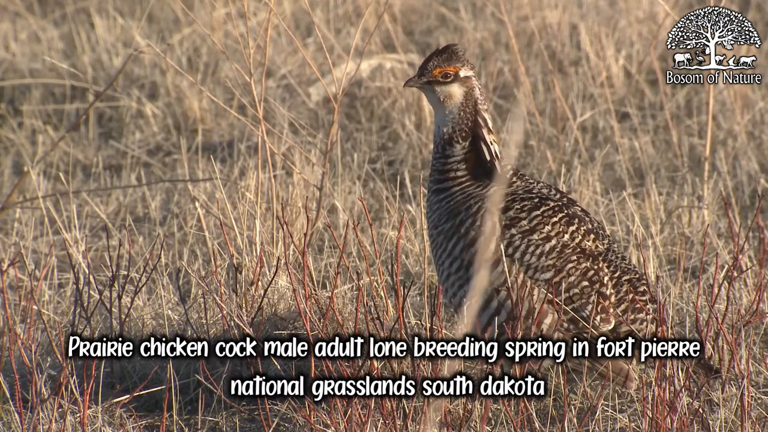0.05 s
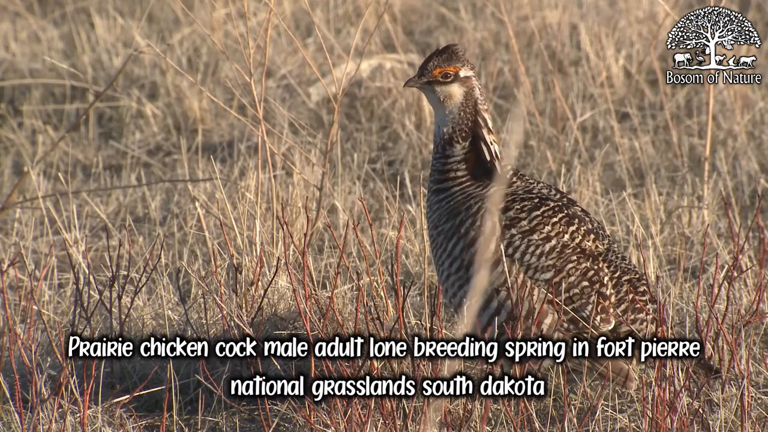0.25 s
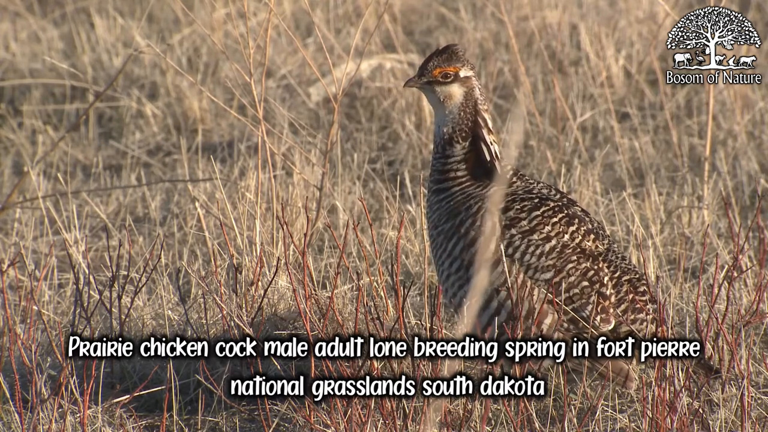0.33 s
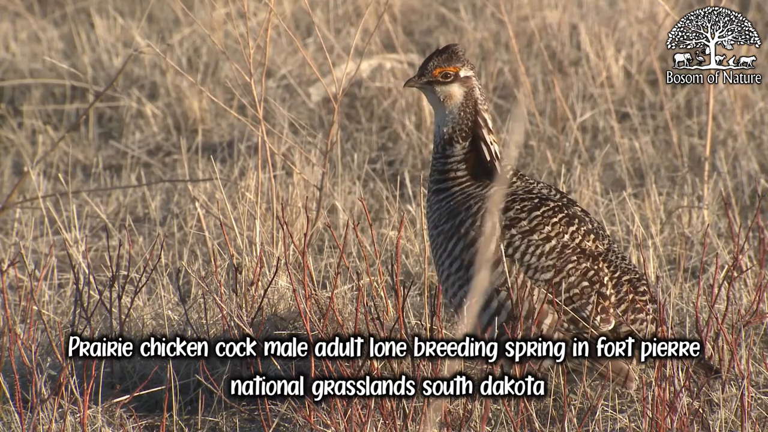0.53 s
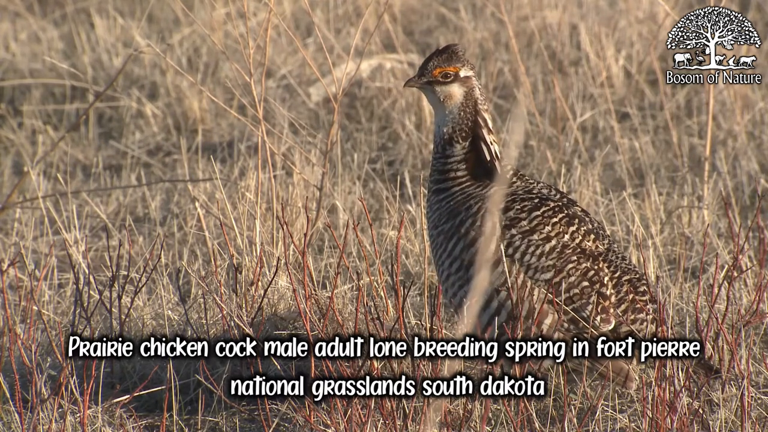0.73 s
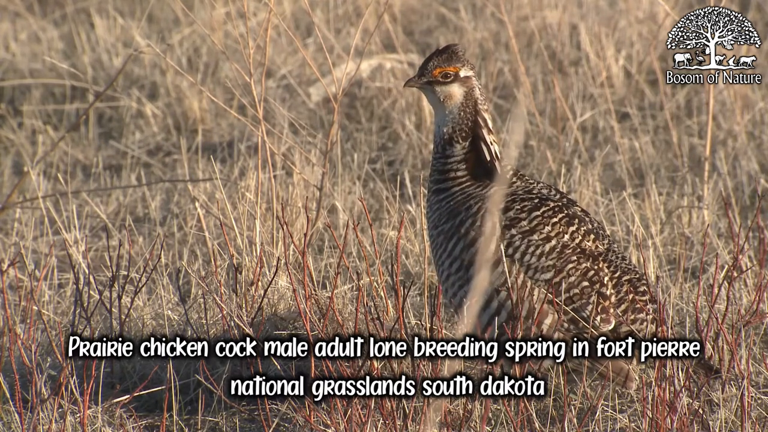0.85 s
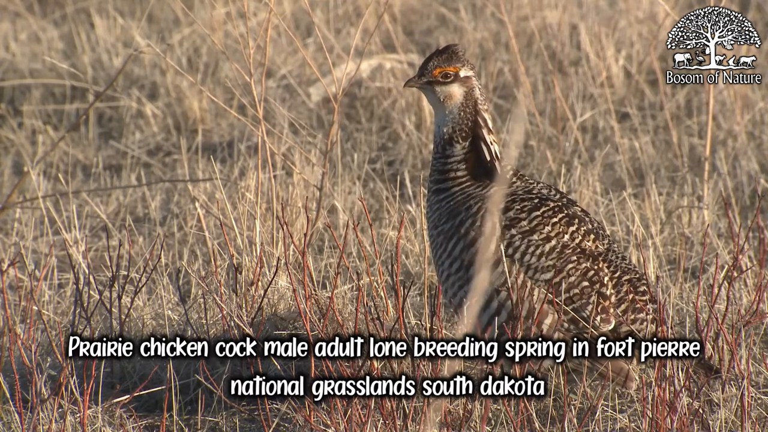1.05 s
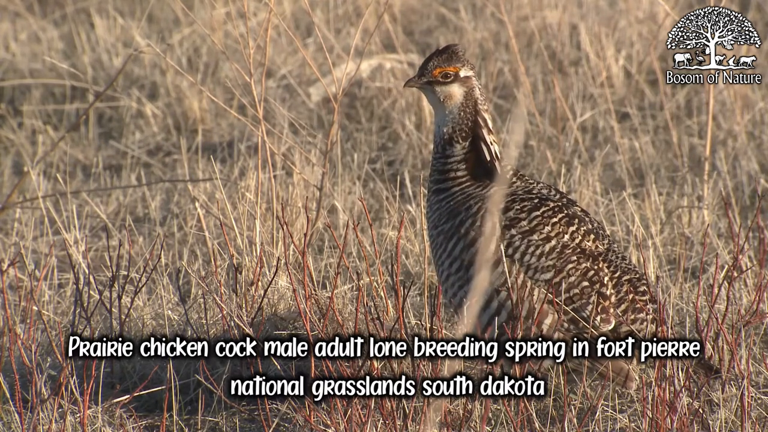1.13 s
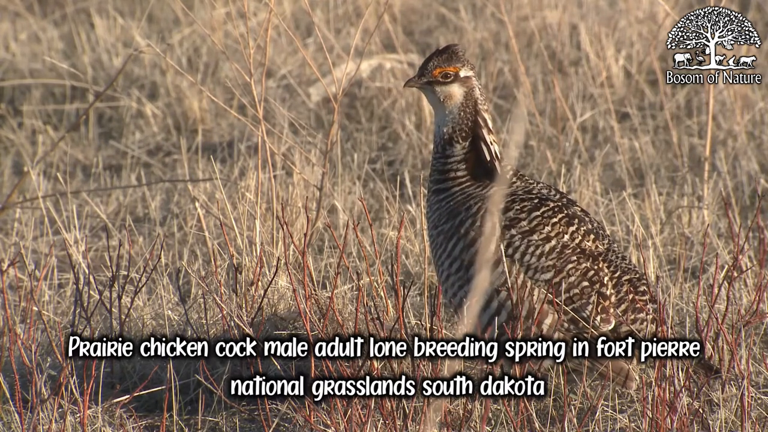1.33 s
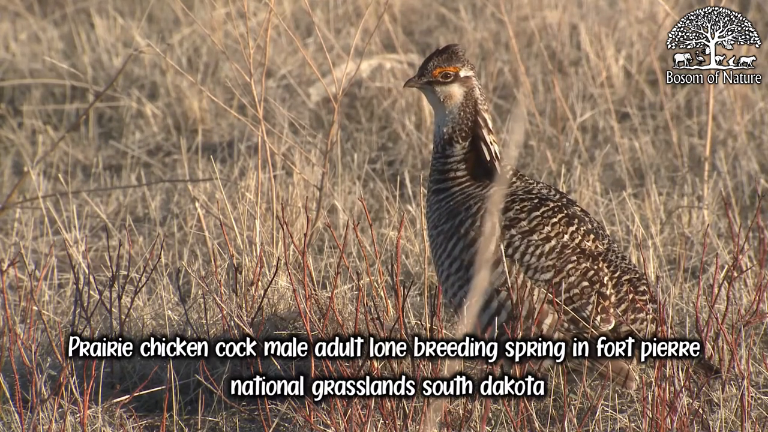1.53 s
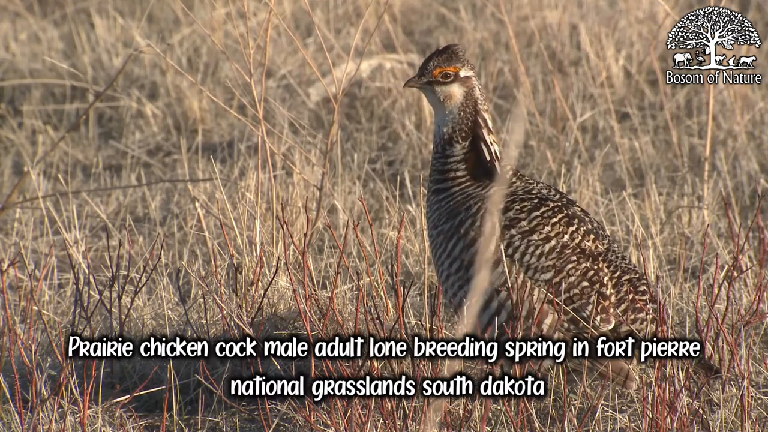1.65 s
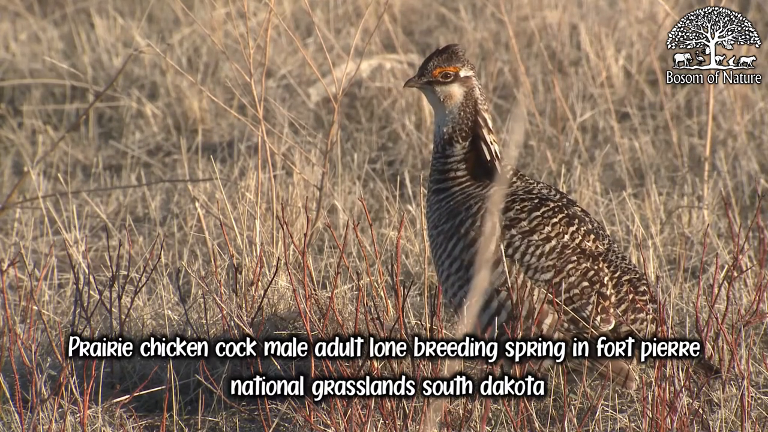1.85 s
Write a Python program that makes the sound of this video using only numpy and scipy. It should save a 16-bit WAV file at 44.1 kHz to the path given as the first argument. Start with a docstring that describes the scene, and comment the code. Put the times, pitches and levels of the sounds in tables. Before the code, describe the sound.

Wind rumbles unevenly on the microphone and hisses through dry grass in open country. A songbird whistles faintly far off, then a small bird chips twice and a distant grouse gives one low hoot.

```python
"""Gust over dry grassland

Out in the open, wind buffets a single microphone and rushes, hisses and ticks through the stems.
A songbird whistles very far off, a small bird gives two short raspy chips, and a distant grouse
hoots one low, sinking note. The microphone feeds the right channel; the left holds only the
faint preamplifier hiss that lies under both."""
import sys
import numpy as np
from scipy import signal
from scipy.io import wavfile
from scipy.ndimage import uniform_filter1d

SR = 44100
rng = np.random.default_rng(int(sys.argv[2]) if len(sys.argv) > 2 else 0)


def transcribe(signal):
    """Save signal, clipped to [-1, 1], as a 16-bit WAV file at the path in sys.argv[1]."""
    frames = np.atleast_2d(signal).T
    limited = np.clip(frames, -1, 1)
    pcm = np.round(limited * 32767).astype(np.int16)
    wavfile.write(sys.argv[1], SR, pcm)


N = 83790

# wind pressure on the microphone: time_s, relative_level_db
WIND_PRESSURE = [(0.0, -48.5), (0.178, -45), (0.232, -34), (0.29, -47.5), (0.386, -39), (0.422, -40.5),
                 (0.486, -35.5), (0.598, -35.5), (0.612, -43), (0.656, -26), (0.698, -39.5), (0.718, -32.5),
                 (0.75, -39), (0.782, -25), (0.82, -41), (0.84, -28.5), (0.942, -38), (0.994, -25.5),
                 (1.042, -28), (1.062, -39), (1.122, -29), (1.158, -39.5), (1.29, -40.5), (1.316, -55.5),
                 (1.47, -37), (1.496, -43), (1.528, -34), (1.676, -47.5), (1.73, -45), (1.782, -60),
                 (1.878, -55.5), (1.9, -45)]
# rumble of the large eddies: frequency_hz, relative_density_db
RUMBLE_SPECTRUM = [(15, -7.5), (28, -0.5), (45, 3), (65, -6), (100, -12), (140, -21.5), (220, -45)]
# smaller eddies around the windshield: time_s, relative_level_db
FLUTTER_LEVELS = [(0.0, -65), (0.158, -67), (0.226, -56.5), (0.258, -58.5), (0.464, -50), (0.554, -52.5),
                  (0.634, -44), (0.814, -42.5), (0.972, -49.5), (0.994, -43), (1.306, -57.5), (1.56, -50),
                  (1.676, -62), (1.9, -69.5)]
# flutter of those eddies: frequency_hz, relative_density_db
FLUTTER_SPECTRUM = [(70, -6.5), (115, 1), (160, -4.5), (230, -10), (320, -22), (450, -33)]
# the gust in the grass: time_s, relative_rush_db, relative_treble_db
GUST_LEVELS = [(0.0, -62.5, -71.5), (0.014, -63.5, -68.5), (0.222, -62.5, -68), (0.242, -58.5, -67),
               (0.374, -58.5, -65.5), (0.422, -61, -67), (0.544, -56.5, -66.5), (0.666, -57.5, -64.5),
               (0.676, -54, -65.5), (0.718, -58, -63.5), (0.956, -56, -65), (1.01, -51.5, -63),
               (1.042, -55, -60), (1.052, -50.5, -59.5), (1.068, -55.5, -63), (1.136, -54.5, -64),
               (1.348, -60, -67.5), (1.528, -57.5, -64.5), (1.888, -62.5, -68.5), (1.9, -61, -70)]
# broad rush of the grass: frequency_hz, relative_density_db
RUSH_SPECTRUM = [(150, -8.5), (280, 0.5), (450, 0), (800, -3.5), (1500, -8), (3000, -15), (6000, -21),
                 (15000, -34)]
# hiss of the dry stems: frequency_hz, relative_density_db
STEM_SPECTRUM = [(1000, -32), (2500, 4), (4000, -1), (6000, 0), (9000, -1.5), (13000, -4), (16000, -6)]
# the far songbird's notes: start_s, length_s, pitch_hz, level_db
SONG_NOTES = [(-.02, .1, 3780, -72), (0.103, .2, 2610, -73), (0.227, .13, 3100, -66),
              (0.352, .11, 3080, -67), (0.422, .11, 2460, -62)]
# preamplifier noise: frequency_hz, relative_density_db
PREAMP_SPECTRUM = [(20, 22), (45, 20.5), (100, 9), (250, 3.5), (1000, -0.5), (8000, -1), (15000, -4)]
# the small bird's chips: peak_s, level_db
CHIP_PEAKS = [(1.008, -38.5), (1.302, -50)]
# rasp of a chip: frequency_hz, relative_density_db
RASP_SPECTRUM = [(2000, -25), (3000, -25), (3600, -1), (4100, 4), (4800, 0), (5600, -15), (7000, -32)]
# the grouse's hoot: time_s, pitch_hz, level_db
HOOT_CONTOUR = [(1.33, 308, -84), (1.39, 313, -62.5), (1.46, 308.9, -49), (1.54, 299.8, -50),
                (1.65, 295, -54.5), (1.75, 297, -67.5), (1.84, 298.7, -55.5), (1.9, 291, -60)]


def from_db(db):
    """Decibels to gain."""
    return 10 ** (np.asarray(db) / 20)


def unit_rms(x):
    """Scale to an rms of 1."""
    return x / np.sqrt(np.mean(x ** 2) + 1e-20)


def curves(rows):
    """Each column after the time, interpolated sample by sample."""
    time_s, *columns = np.transpose(rows)
    return [np.interp(np.arange(N) / SR, time_s, column) for column in columns]


def tone(pitch_hz):
    """A sine of rms 1 that follows a pitch curve."""
    return np.sqrt(2) * np.sin(2 * np.pi * np.cumsum(pitch_hz) / SR)


def drift(rate_hz):
    """Smooth random wander with a spread of 1, mostly slower than rate_hz."""
    step, settle = 40, 2000
    pole = np.exp(-2 * np.pi * rate_hz * step / SR)
    white = rng.standard_normal(N // step + settle + 2)
    slow = signal.lfilter([1], [1, -2 * pole, pole ** 2], white)[settle:]
    return np.interp(np.arange(N) / step, np.arange(len(slow)), unit_rms(slow))


def coloured_noise(spectrum, flicker_db):
    """Third-octave bands of noise, each with its own level and flicker; rms 1."""
    hz, db = np.transpose(spectrum)
    edges_hz = 16 * 2 ** (np.arange(32) / 3)
    white = rng.standard_normal((2, N + SR // 2))
    out = 0
    for k, (low, high) in enumerate(zip(edges_hz, edges_hz[1:])):
        bandpass = signal.butter(2, [low, high], "band", fs=SR, output="sos")
        band = signal.sosfilt(bandpass, white[k % 2])[-N:]
        centre_hz = np.sqrt(low * high)
        octaves_outside = abs(np.log2(centre_hz / np.clip(centre_hz, hz[0], hz[-1])))
        level_db = np.interp(np.log(centre_hz), np.log(hz), db) - 20 * octaves_outside
        out += band * from_db(level_db + flicker_db * drift(rate_hz=10.4))
    return unit_rms(out)


def wind_on_microphone(rumble_gain_db=6.5, flutter_gain_db=5, eddy_s=0.053, evenness=0.74):
    """Eddies push on the microphone: a lumpy rumble, and a lighter flutter around the windshield."""
    pressure_db, = curves(WIND_PRESSURE)
    flutter_db, = curves(FLUTTER_LEVELS)
    eddies = coloured_noise(RUMBLE_SPECTRUM, flicker_db=1)
    eddy_power = uniform_filter1d(eddies ** 2, int(eddy_s * SR)) + 1e-9
    # partly even out chance swells, so the rumble keeps to the wind pressure
    evened = unit_rms(eddies / eddy_power ** (evenness / 2))
    rumble = from_db(rumble_gain_db + pressure_db) * evened
    flutter = from_db(flutter_gain_db + flutter_db) * coloured_noise(FLUTTER_SPECTRUM, flicker_db=-0.5)
    return rumble + flutter


def wind_in_grass(rush_gain_db=8, hiss_gain_db=7, tick_gain_db=-4.5, base_ticks_per_s=830):
    """Air through dry grass: a broad rush, a bright hiss from the stems and tiny ticks where they touch."""
    rush_db, treble_db = curves(GUST_LEVELS)
    rush = from_db(rush_gain_db + rush_db) * coloured_noise(RUSH_SPECTRUM, flicker_db=0.63)
    hiss = from_db(hiss_gain_db + treble_db) * coloured_noise(STEM_SPECTRUM, flicker_db=1.28)
    # stems touch more often as the gust rises
    ticks_per_s = base_ticks_per_s * from_db(treble_db - treble_db.mean())
    touches = (rng.random(N) < ticks_per_s / SR) * rng.standard_normal(N)
    tick_band = signal.butter(1, [2000, 8000], "band", fs=SR, output="sos")
    ticks = unit_rms(signal.sosfilt(tick_band, touches + 1e-18))
    return rush + hiss + from_db(tick_gain_db + treble_db) * ticks


def far_songbird(fall_hz_per_s=900, blur_hz=60):
    """Thin falling whistles, barely above the wind, their pitch blurred by distance."""
    out = 0
    for start_s, length_s, pitch_hz, level_db in SONG_NOTES:
        t = np.clip(np.arange(N) / SR - start_s, 0, length_s)
        slur_hz = pitch_hz - fall_hz_per_s * (t - length_s / 2)
        swell = np.sin(np.pi * t / length_s)
        out += from_db(level_db) * swell * tone(slur_hz + blur_hz * drift(rate_hz=60))
    return out


def preamp_hiss(level_db=-76):
    """One channel of the preamplifier's faint, steady noise."""
    return from_db(level_db) * coloured_noise(PREAMP_SPECTRUM, flicker_db=0)


def small_bird(pitch_hz=4105, jitter_hz=200.8, whistle_over_rasp_db=-4.5):
    """Each chip is a quick, pulsing swell: an unsteady whistle wrapped in rasp."""
    attack_s, release_s = 0.0076, 0.0098
    pulse_hz, pulse_depth = 350, 0.35
    whistle = tone(pitch_hz + jitter_hz * drift(rate_hz=149.7))
    rasp = coloured_noise(RASP_SPECTRUM, flicker_db=4)
    voice = unit_rms(rasp + from_db(whistle_over_rasp_db) * whistle)
    out = 0
    for peak_s, level_db in CHIP_PEAKS:
        t = np.arange(N) / SR - peak_s
        rise = np.exp(-(np.minimum(t, 0) / attack_s) ** 2 / 2)
        decay = np.exp(-np.maximum(t, 0) / release_s)
        pulses = 1 + pulse_depth * np.cos(2 * np.pi * pulse_hz * t)
        out += from_db(level_db) * rise * decay * pulses * voice
    return out


def far_grouse():
    """A distant hoot: one pure tone that sinks, fades and briefly swells again."""
    pitch_hz, level_db = curves(HOOT_CONTOUR)
    return from_db(level_db) * tone(pitch_hz)


def scene():
    """The microphone goes to the right channel; each channel has its own preamplifier hiss."""
    microphone = wind_on_microphone() + wind_in_grass() + far_songbird() + small_bird() + far_grouse()
    return np.array([preamp_hiss(), preamp_hiss() + microphone])


def record(dry):
    """A steep low-pass cuts the top of the treble."""
    cutoff_hz = 15700
    lowpass = signal.ellip(12, 0.1, 80, cutoff_hz, fs=SR, output="sos")
    return signal.sosfilt(lowpass, dry)


dry = scene()
out = record(dry)
transcribe(out)
```